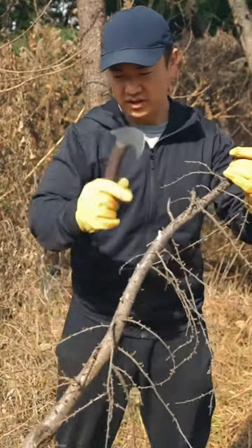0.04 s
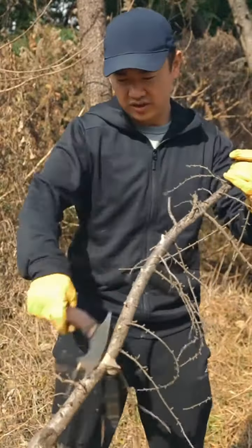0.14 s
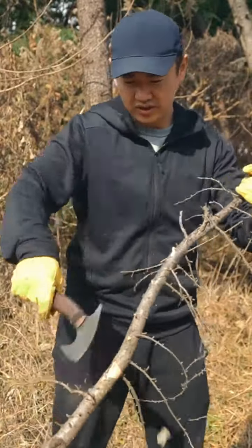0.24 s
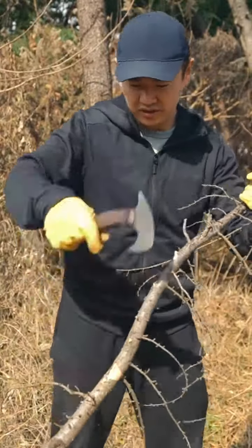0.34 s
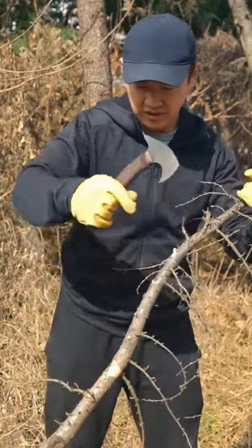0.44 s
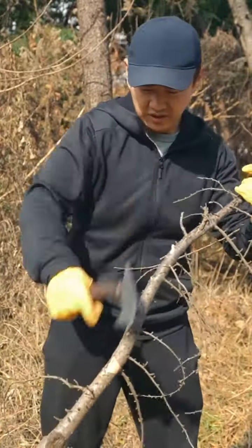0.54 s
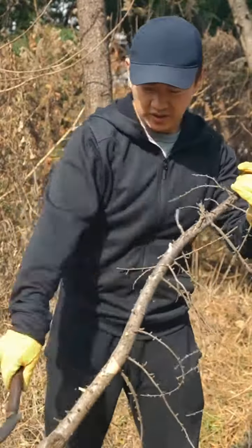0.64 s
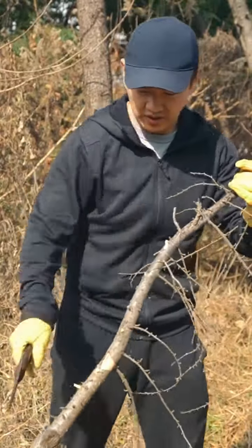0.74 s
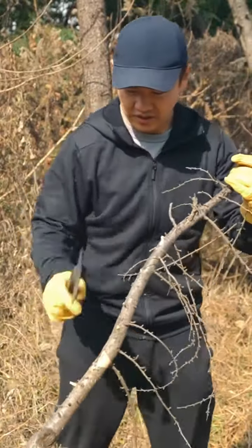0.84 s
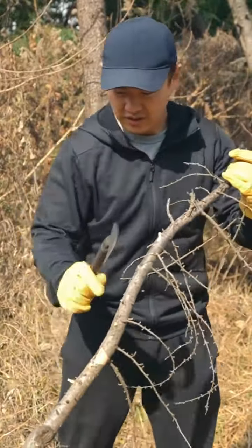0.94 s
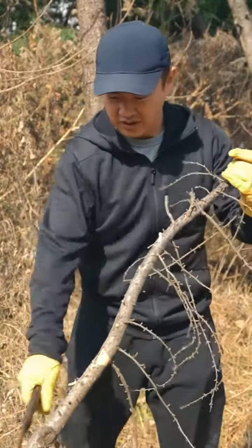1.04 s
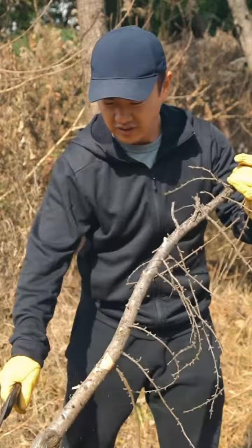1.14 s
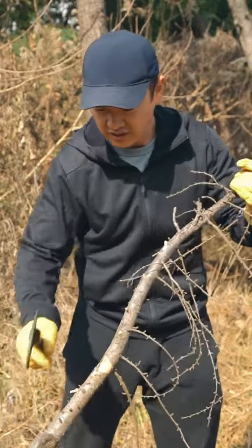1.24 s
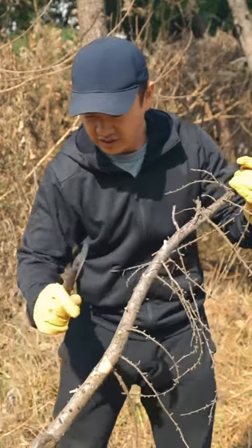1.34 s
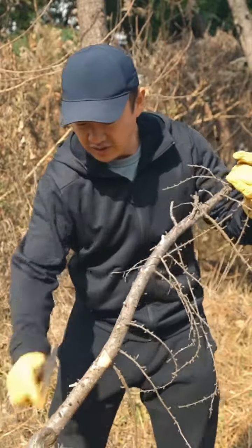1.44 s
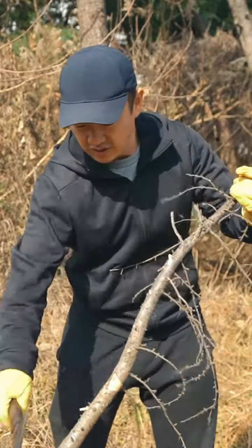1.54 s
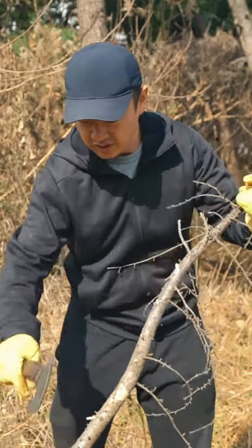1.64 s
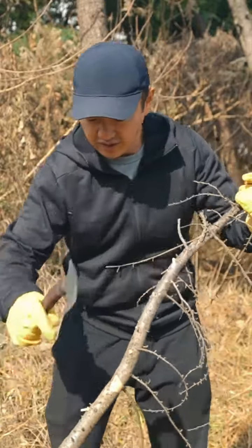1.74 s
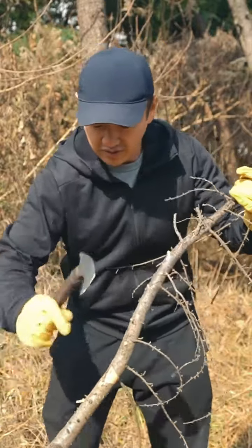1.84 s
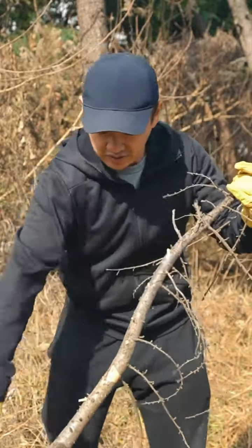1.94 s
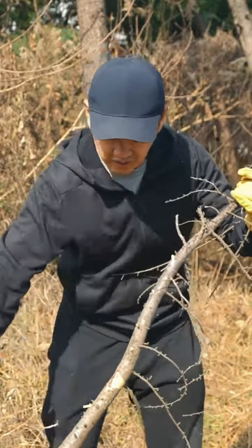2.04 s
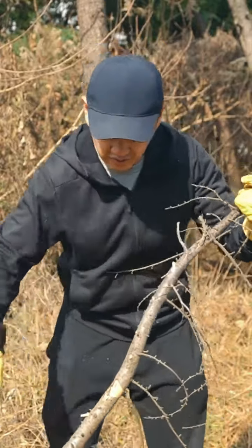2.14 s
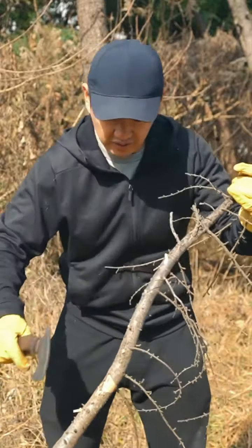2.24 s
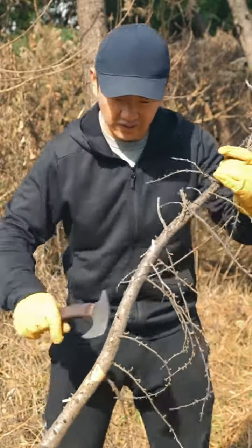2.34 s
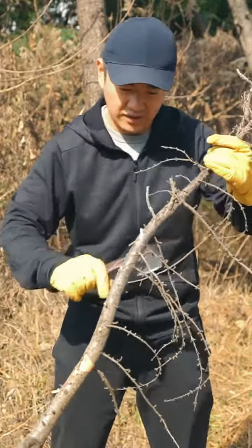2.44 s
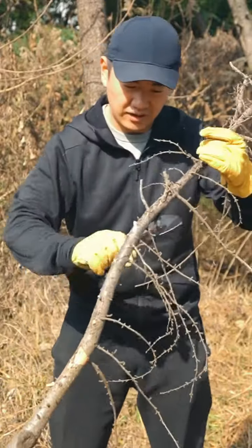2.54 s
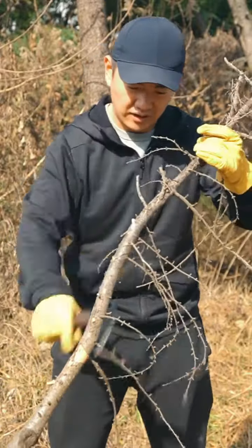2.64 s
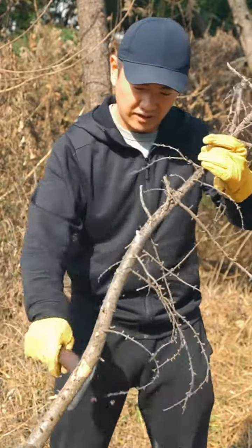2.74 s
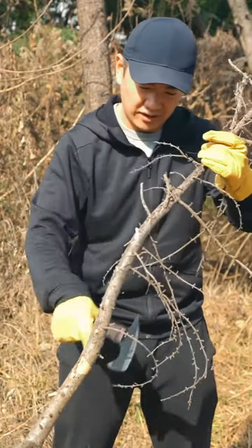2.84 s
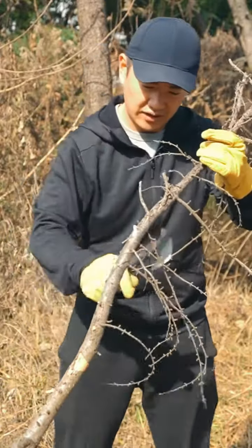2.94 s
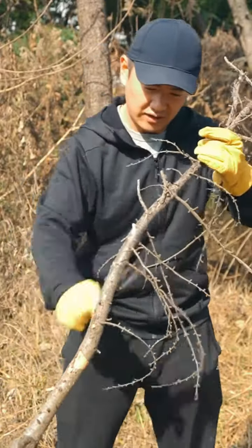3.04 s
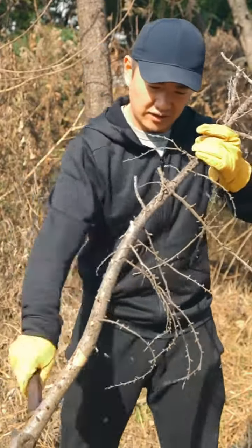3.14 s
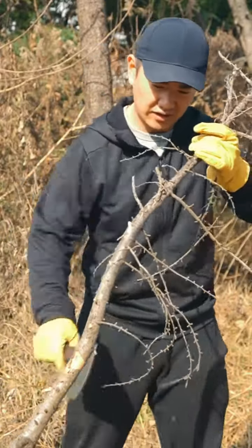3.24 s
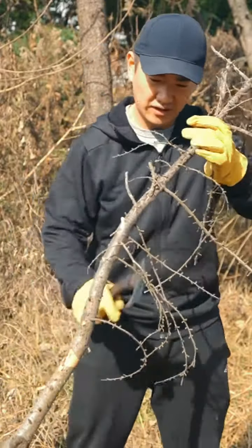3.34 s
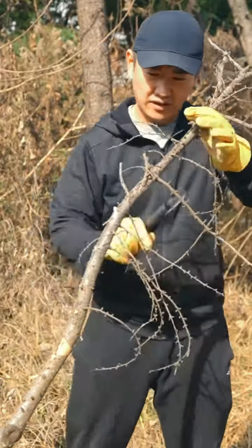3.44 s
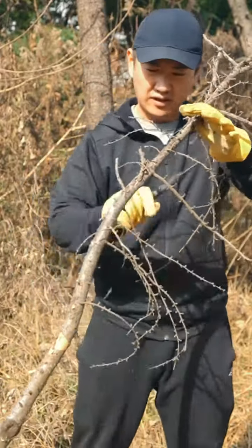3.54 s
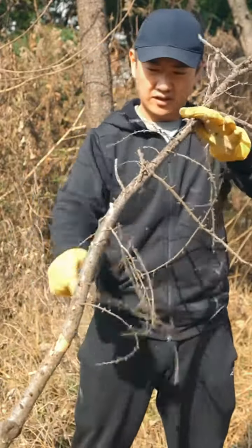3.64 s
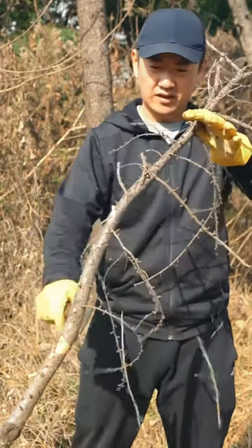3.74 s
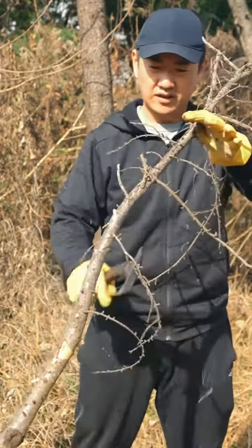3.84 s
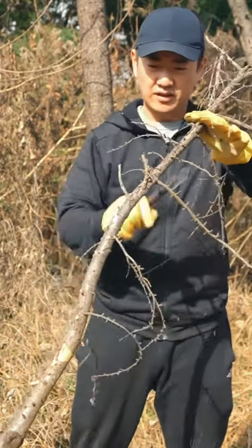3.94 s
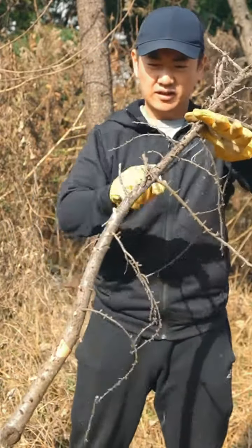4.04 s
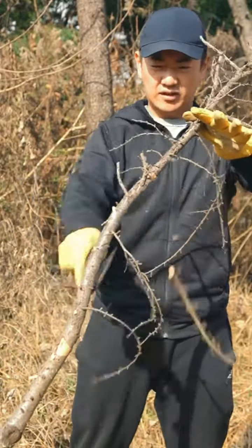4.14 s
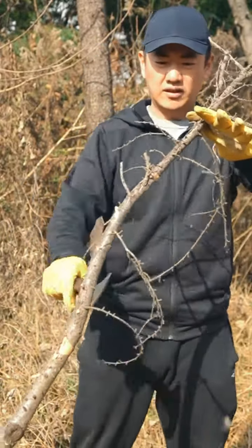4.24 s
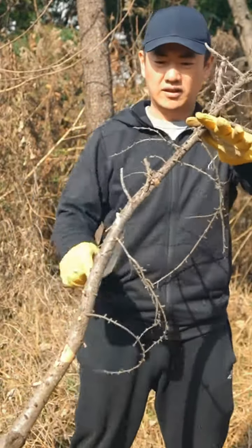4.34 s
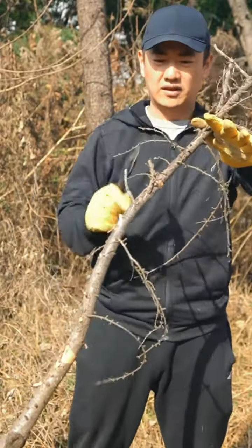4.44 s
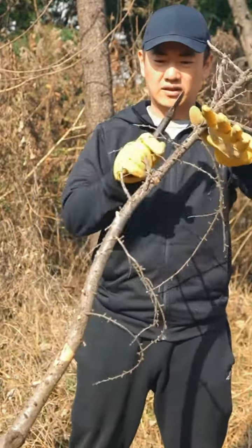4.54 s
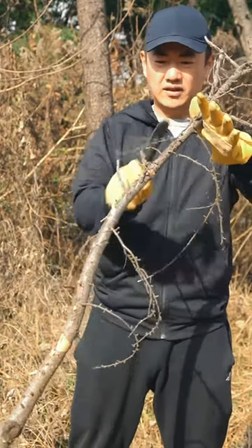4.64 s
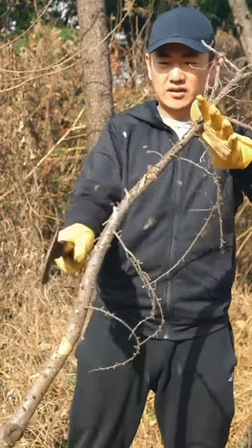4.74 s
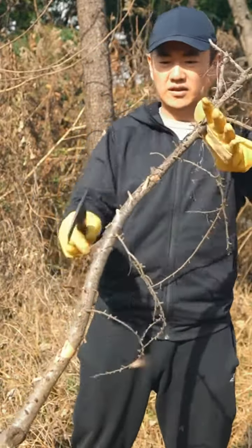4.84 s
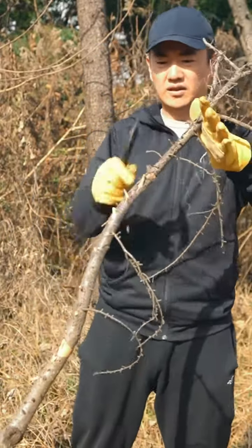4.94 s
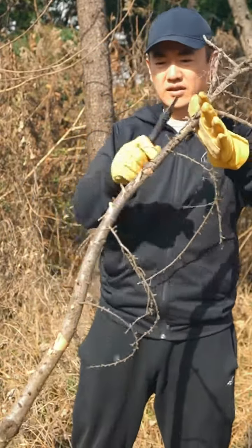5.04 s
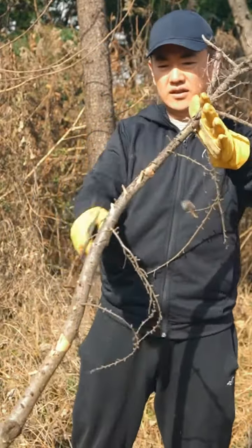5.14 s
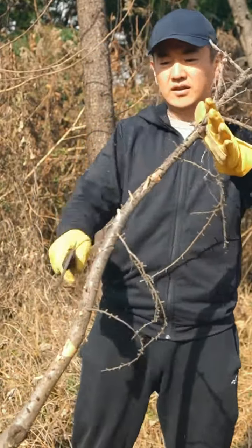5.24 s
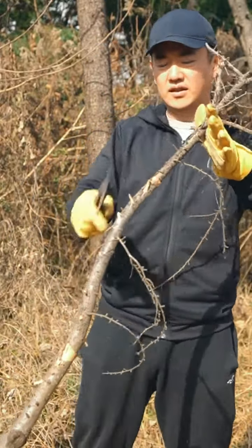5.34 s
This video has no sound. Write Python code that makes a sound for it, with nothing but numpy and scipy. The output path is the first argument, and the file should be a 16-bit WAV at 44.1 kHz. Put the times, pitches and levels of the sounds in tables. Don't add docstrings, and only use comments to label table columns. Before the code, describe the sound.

A hand axe chops dry twigs off a held branch outdoors, sharp woody cracks with twig ticks and rustle over a low distant drone.

```python
import sys
import numpy as np
from scipy import signal
from scipy.fft import rfft, irfft, next_fast_len
from scipy.io import wavfile
from scipy.ndimage import uniform_filter1d

SR = 44100
rng = np.random.default_rng(int(sys.argv[2]) if len(sys.argv) > 2 else 0)


def master_out(mix):
    frames = np.transpose(np.atleast_2d(mix))
    ceiling = np.clip(frames, -1, 1)
    pcm = np.round(ceiling * 32767).astype(np.int16)
    wavfile.write(sys.argv[1], SR, pcm)


def level_to_linear(level):
    exponent = np.asarray(level, float) / 20
    return 10 ** exponent


N = 238443
TIME = np.arange(N) / SR
LAG_S = .0009
BRANCH_T60_S = .017


def unit(x):
    return x / np.sqrt(np.mean(x ** 2))


def peak(x, db):
    return x * level_to_linear(db) / np.max(np.abs(x))


def add(out, s, x):
    i = max(int(s * SR), 0)
    out[i:i + len(x)] += x[:N - i]


def band(x, lo_hz, hi_hz, order=2):
    sos = signal.butter(order, [lo_hz, min(hi_hz, .47 * SR)], "band", fs=SR, output="sos")
    return signal.sosfilt(sos, x)


def ring(x, hz, t60):
    r = np.exp(-np.log(1000) / (t60 * SR))
    turn = 2 * np.pi * hz / SR
    return signal.lfilter([np.sin(turn)], [1, -2 * r * np.cos(turn), r * r], x)


def colour(x, points):
    size = next_fast_len(len(x))
    hz, db = np.transpose(points)
    bins_hz = np.arange(size // 2 + 1) * SR / size
    gain = level_to_linear(np.interp(np.log(bins_hz + 1), np.log(hz), db, right=-90))
    return unit(irfft(rfft(x, size) * gain, size)[:len(x)])


def walk(rate):
    k = int(SR / rate)
    steps = np.repeat(rng.standard_normal(N // k + 1), k)
    return unit(uniform_filter1d(uniform_filter1d(steps, k), k)[:N])


def swell(s, db, rise, fall, hold=0):
    early = (s - TIME) / max(rise, 1e-3)
    late = np.maximum(TIME - s - hold, 0) / max(fall, 1e-3)
    return level_to_linear(db - 20 * np.maximum(early, late))


def grit(size, share, spread_db):
    noise, pick, tall = rng.standard_normal(size), rng.random(size), rng.exponential(size=size)
    return unit(noise * np.where(pick < share, level_to_linear(5.5 + spread_db * tall), 1))


def crackle(size, rate, spread_db, seconds):
    pick, tall = rng.random(size), rng.exponential(size=size)
    starts = np.where(pick < rate / SR, level_to_linear(spread_db * np.minimum(tall, 2.5)), 0)
    return 1 + signal.lfilter([1], [1, -np.exp(-1 / (seconds * SR))], starts)


def slips(t, seconds, first=4.4):
    volley = grit(len(t), 0.081, 3.6) * np.exp(-t / seconds)
    volley[0] += first
    return volley


def crack(db, branch_hz, branch_db, splinter_hz, snap_db, splinter_octaves):
    t = TIME[:3000]
    push, odd = slips(t, 0.003, first=7.5), rng.random(3)
    soft_hz = min(9000 * 2 ** (snap_db / 10), .4 * SR)
    soft = signal.lfilter(*signal.butter(2, soft_hz, fs=SR), push)

    branch_ratios = (1, 0.554 + 0.254 * odd[0], 0.764 + 0.432 * odd[1])
    knock = sum(ring(soft, branch_hz * ratio, BRANCH_T60_S) for ratio in branch_ratios)
    knock += 0.43 * band(soft, 300, 1500, order=1)

    splinter_hz, splinter_t60_s = splinter_hz * 2 ** (splinter_octaves * odd[2]), .006
    splinter = ring(soft, splinter_hz, splinter_t60_s)
    splinter += 0.33 * ring(soft, splinter_hz * (1.29 + 0.31 * odd[1]), splinter_t60_s)
    splinter += 6.3 * band(soft, 1900, 4970)

    snap = band(push * np.exp(-t / 0.0017), 6640, 13800)
    sound = peak(band(knock, 330, 9000), db + branch_db)
    sound += peak(band(splinter, 1560, 6100, order=1), db + 0.5)
    return sound + peak(snap, db + snap_db)


# [t/s, splinter peak level/dB, branch f/Hz, splinter f/Hz, snap level over splinter/dB]
MAIN_BREAKS = [(0.0746, 6.5, 570, 3310, 4), (0.082, 1, 1210, 4660, -1), (0.0933, -6, 1450, 1970, -8),
               (0.1105, -5.5, 1370, 3000, -3), (0.1277, -11.5, 1810, 4480, -3),
               (0.5314, -0.5, 1295, 3600, 5), (0.971, 4, 1250, 3170, 1.5), (1.4228, 7, 1200, 2800, 4.5),
               (1.4765, 2, 1650, 2300, 7), (1.8745, -0.5, 1990, 2070, 12.5),
               (1.8929, -5.5, 1180, 2940, -22), (2.602, -0.5, 1380, 2330, -13),
               (2.6098, -1.5, 800, 3120, -1.5), (2.6141, -2, 1270, 2530, 3), (3.0325, -6, 1150, 3240, -5),
               (3.5829, 2.5, 1290, 1980, 3), (3.5936, -5, 856, 2390, -3), (3.6848, -9, 930, 3240, 5.5),
               (4.0544, -2.5, 1640, 3390, 13.5), (4.0981, -5, 730, 2520, -25), (4.6259, -3, 1500, 2920, -8),
               (4.6322, -8, 1256, 3360, 23), (5.066, 0.5, 700, 2490, 3)]
# [t/s, splinter peak level/dB, branch f/Hz, branch level over splinter/dB, snap level over splinter/dB]
LIGHT_KNOCKS = [(0.0973, -11.5, 900, -1, 15), (0.984, -7, 1050, -7, -14), (0.997, -20.5, 810, 11.5, -20),
                (1.4494, -9, 1250, 2, -33), (2.573, -22, 1500, 1.5, -3), (3.0111, -14, 760, -7, 3),
                (3.016, -24, 830, 8, -15), (3.0385, -16, 1200, 4, 0), (1.8748, -12, 700, 4, -20),
                (2.6025, -18, 560, 5, -20), (.9725, -19, 560, 5, -20), (3.0265, -10.5, 1080, 7.5, -9),
                (3.0528, -23, 830, 13, -12), (3.5582, -9.5, 905, 3.5, -4), (3.6065, -11, 613, 2.5, -9),
                (4.0536, -9.5, 820, 1.5, -26), (4.0664, -13, 910, -9, -10), (4.108, -12, 1480, 3.5, -21),
                (2.607, -7, 1450, -1, -13), (1.8842, -9, 900, -6, -7), (4.7391, -19, 2000, 4, 1),
                (4.716, -16, 2100, 1.5, -10)]
# [t/s, splinter peak level/dB, splinter f/Hz, snap level over splinter/dB]
THIN_SPLITS = [(0.5289, 0, 1700, -31), (1.4691, -7, 2050, -22), (1.4884, -5.5, 2940, 6),
               (1.505, -16, 4500, 9), (1.4935, -15, 2600, 0), (1.498, -15, 3300, 0), (1.511, -14, 2200, 0),
               (1.911, -10, 3600, -12), (1.915, -10, 3900, -4.5), (1.921, -20, 3000, 5.5),
               (2.6478, -10, 4350, 4), (5.065, -10, 3380, 7), (4.6023, -9, 4800, -11),
               (4.6116, -6.5, 2980, -2), (4.7104, -9.5, 2310, 3), (4.781, -24, 4440, 23),
               (4.797, -20, 4440, 11)]


def cracks():
    out, events = np.zeros(N), []
    for s, db, branch_hz, splinter_hz, snap_db in MAIN_BREAKS:
        branch_db = -4 + 7 * np.log2(branch_hz / 1200)
        events.append((s, db, branch_hz, branch_db, splinter_hz, snap_db, 0))
    for s, db, branch_hz, branch_db, snap_db in LIGHT_KNOCKS:
        events.append((s, db, branch_hz, branch_db, 2140, snap_db, 0.32))
    for s, db, splinter_hz, snap_db in THIN_SPLITS:
        events.append((s, db, 1160, -19, splinter_hz, snap_db, 0))
    for s, *settings in sorted(events):
        add(out, s + LAG_S, crack(*settings))
    return out


# [t/s, ring level/dB, lower-mode level/dB, time the edge chatters in the wood/s, upper-mode level/dB]
STEEL_BLOWS = [(0.0755, -16, 0, 0.018, -6), (0.0984, -21, 0, .008, -6), (.127, -28, 3, 0.004, 7),
               (0.531, -14, -8, 0.005, 1), (0.972, -31, -3, 0.003, 10), (.985, -23, 0, .012, -14),
               (1.424, -14, 0, 0.0028, -10), (1.4754, -28, 0, 0.0025, -4), (1.8745, -11, -10, 0.003, 1),
               (1.918, -25, -4, 0.0089, -6), (2.606, -21, 6, 0.006, -5), (3.034, -28, -3, 0.005, 7),
               (3.5575, -25, 0, 0.0031, 3), (3.594, -17, 0, 0.014, -9), (4.0536, -26, 0, 0.004, 0),
               (4.098, -23, 0, 0.0052, -14), (4.6124, -22, 4, 0.012, -2), (5.0664, -22, 0, 0.01, -8)]
# [f/Hz, level/dB]
HEAD_MODES = [(2859, -6), (3989, -8), (4640, -4), (7210, 0), (7919, -8), (8712, -14), (10890, -4),
              (13390, -13)]


def axe_head():
    out, t = np.zeros(N), TIME[:5000]
    t60_s, scatter_db = .021, 2
    for s, ring_db, lower_db, chatter_s, upper_db in STEEL_BLOWS:
        share = rng.standard_normal((len(HEAD_MODES), 3))
        edge = slips(t, chatter_s)
        edge /= np.sqrt(np.sum(edge ** 2))
        steel = np.zeros(len(t))
        for (hz, db), (level_odd, pitch_odd, decay_odd) in zip(HEAD_MODES, share):
            mode_db = db + scatter_db * level_odd
            if hz > 9500:
                mode_db += upper_db
            if hz < 6000:
                mode_db += lower_db
            mode = ring(edge, hz * (1 + 0.0046 * pitch_odd), t60_s * level_to_linear(scatter_db * decay_odd))
            steel += level_to_linear(mode_db) * mode
        add(out, s + LAG_S, level_to_linear(ring_db + 4.0) * steel)
    return out


# [t/s, thud level/dB]
BRANCH_THUDS = [
    (.0755, -29),
    (.127, -4),
    (1.424, -17),
    (1.8745, -3),
    (2.603, -31),
    (3.5575, -7),
    (3.594, -25),
    (4.0536, -8),
    (4.6124, -27),
    (5.0664, -15),
]


def thuds():
    out, t = np.zeros(N), TIME[:5000]
    tap = np.exp(-t / 0.000079) / 25
    for s, thud_db in BRANCH_THUDS:
        odd = rng.standard_normal(2)
        thud = ring(tap, 200 * (1 + 0.041 * odd[0]), 0.011)
        thud += 0.54 * ring(tap, 330 * (1 + 0.12 * odd[1]), 0.07)
        add(out, s + LAG_S, level_to_linear(thud_db) * band(thud, 175, 3000))
    return out


# [t/s, length/s, level/dB, centre f/Hz, hiss level over body/dB]
FIBRE_TEARS = [(.085, 0.056, -21, 1820, -1.5), (0.531, 0.018, -14.5, 1250, -4),
               (0.973, 0.022, -11.5, 1160, -11), (1.432, 0.094, -22.5, 1680, -3.5),
               (1.474, 0.013, -16, 1800, 4), (1.486, 0.05, -23, 2200, 5), (1.874, 0.012, -18.5, 1010, -3),
               (1.889, .045, -21, 2400, -9), (2.6002, 0.031, -11.5, 1475, -21),
               (2.63, 0.038, -24, 2010, -1), (2.65, 0.026, -25, 3000, 4), (3.012, 0.028, -21.5, 1010, -7),
               (3.024, 0.033, -18, 1170, -12), (3.554, 0.038, -18, 1280, -14),
               (3.585, 0.062, -12.5, 1080, -13), (4.058, 0.029, -20, 900, -2),
               (4.096, 0.022, -14, 1813, -16), (4.338, 0.025, -35, 2790, -6),
               (4.612, 0.036, -15, 1580, -2.5), (4.704, 0.021, -21.5, 2020, 3),
               (4.736, 0.022, -28.5, 1800, -10), (4.789, 0.042, -30.5, 4300, 4.5),
               (5.062, 0.028, -18.5, 1200, -4)]
# [f/Hz, level/dB]
LEAF_SPECTRUM = [(710, -30), (1200, 0), (2740, -5), (2980, -3), (4070, -4), (6370, -5.5), (7730, -3),
                 (10800, -8), (12600, -4), (15500, -9)]


def tears():
    out, t = np.zeros(N), TIME[:7000]
    for s, length, db, hz, hiss_db in FIBRE_TEARS:
        stream = grit(len(t), .01, 2.0) * crackle(len(t), 400, .8, .001)
        wood = sum(unit(ring(stream, hz * ratio, BRANCH_T60_S)) for ratio in (.5, .85, 1.3))
        body = unit(unit(band(stream, hz / 2.96, hz * 1.88)) + .5 * wood)
        body *= np.exp(-(t / length) ** 2 * 1.56)
        hiss = unit(band(colour(stream, LEAF_SPECTRUM), 2000, 12000))
        hiss *= np.exp(-(t / length) ** 0.94 * 1.77)
        onset = np.minimum(t / .004, 1)
        add(out, s + 2 * LAG_S, level_to_linear(db + 1.0) * (body + level_to_linear(hiss_db) * hiss) * onset)
    return out


# [t/s, peak level/dB, centre f/Hz, snap level over tick/dB]
TWIG_TICKS = [(.2476, -22, 5000, -12), (0.3803, -24, 4440, 1), (0.4756, -7, 3940, -20),
              (.506, -25, 4100, 3), (.6866, -29, 4000, 13), (0.7767, -20.5, 2400, 8),
              (0.8753, -12, 3970, -10), (1.055, -24, 2840, 7), (1.188, -17, 6200, -15),
              (1.255, -15.5, 5100, -3), (1.666, -23, 5000, -33), (1.715, -21.5, 3770, -16),
              (1.8128, -11, 4300, 1), (1.989, -20, 6000, 6), (2.024, -17, 3500, 4), (2.149, -9, 3930, 11),
              (2.288, -12.5, 4970, 2), (2.642, -22, 4500, 8), (2.66, -20, 4500, 8),
              (2.7155, -17.5, 5200, -2), (2.733, -23, 3000, 9), (2.81, -19, 4430, -15),
              (2.837, -35, 4000, 5), (2.9104, -22, 5000, 18), (2.926, -16, 4500, 2),
              (2.9927, -18, 3600, -7), (2.994, -19, 3370, 10), (3.003, -30, 4000, 10),
              (3.025, -22, 5000, 17), (3.102, -27, 3800, 12.5), (3.247, -16, 5250, 4),
              (3.6626, -17, 4680, -9), (3.667, -16.5, 4500, -6), (3.8207, -17, 5150, 0),
              (3.8346, -16, 4950, 2), (3.964, -26, 4160, 14), (4.268, -24, 5210, -12),
              (4.3455, -13, 7500, 0), (4.567, -20, 5360, -17), (4.393, -21, 5000, -2),
              (4.5847, -22, 5000, -2), (4.9286, -14, 4600, -16), (5.0242, -25, 5000, 13),
              (5.0412, -24, 5000, 6), (5.059, -18, 4500, 13), (5.084, -13, 4800, 11),
              (5.089, -12.5, 3700, 2), (5.115, -18, 3940, 9), (5.2368, -18, 5550, -16.5),
              (.2151, -26, 5000, 12), (.5908, -24, 2600, 8), (.6606, -27, 4000, 10),
                 (.7439, -28, 3500, 0), (.8981, -21, 3000, 0), (.904, -22, 4000, 0), (.911, -23, 4000, 0),
                 (1.965, -22, 7500, -2), (2.069, -21, 3200, -12), (3.088, -23, 4700, -8),
                 (4.3398, -17, 7000, 3), (4.5394, -26, 4360, -5), (4.9639, -23, 3280, 0)]


def ticks():
    out, t = np.zeros(N), TIME[:1500]
    for s, db, hz, snap_db in TWIG_TICKS:
        push = slips(t, 0.0015)
        tick = peak(band(push, hz / 1.1, hz * 1.1, order=1), db - 5.5)
        tick += peak(band(push, hz / 1.6, hz * 1.76), db - 15)
        tick += peak(band(push, 7500, 12200), db + snap_db - 11.5)
        add(out, s + LAG_S, tick)
    return out


# [t/s, body level/dB, time to fall 20 dB/s, hiss level over body/dB]
SETTLING_LEAVES = [(.15, -27, 0.02, -14), (.56, -35, 0.16, -8), (1.029, -33.5, 0.03, -14),
                   (1.55, -35.5, 0.25, -9.5), (1.94, -34.5, 0.44, -6), (2.68, -34.5, 0.42, -11.5),
                   (3.07, -46, 0.4, -13), (3.65, -33, 0.4, -8), (4.14, -37.5, 0.3, -8),
                   (4.66, -33, 0.11, -9), (4.82, -33, 0.2, -1), (5.11, -39, 0.45, -7.5)]
# [start t/s, hold/s, body level/dB, time to fall 20 dB/s, hiss level over body/dB]
TWIG_BRUSHES = [(0.035, 0.0035, -47, 0, 8), (0.184, 0.15, -43, 0.46, -4.5), (0.653, 0.043, -51, -0.4, -2),
                (0.776, 0.0066, -42, -0.3, -6), (.874, 0.0077, -43, 0.3, -7), (1.183, 0.01, -40, 0.03, -7),
                (1.255, 0.0065, -38, -0.2, -4.5), (2.064, 0.03, -43, 0.4, -14), (1.69, .025, -49, .06, 2),
                (.897, .016, -46, .05, -6), (.59, .01, -43, .06, -2), (1.673, 0.098, -48, 0.14, -2),
                (2.151, 0.014, -49, -0.22, 4), (2.292, 0.014, -42, 0, -4.5), (2.352, .1, -45, -0.14, -6.5),
                (2.576, .012, -38, 0.08, -9), (2.87, 0.053, -39.5, 0.08, 1.5),
                (2.993, 0.017, -33, -0.03, -4.5), (3.21, 0.026, -34.5, 0.15, -5),
                (3.35, .01, -48, 0.5, -5.5), (3.78, 0.022, -40.5, 0.15, -7),
                (3.914, 0.06, -44.5, 0.1, -1.3), (4.26, 0.0089, -44, 0.4, -10.5),
                (4.334, 0.006, -44, 0.2, 2), (4.343, .008, -40, .2, -1), (4.53, 0.11, -49, 0.1, -4),
                (4.944, .05, -39.5, .5, -9), (5.25, 0.018, -40.5, 0, -2)]


def rustle():
    body_gain, hiss_gain = np.zeros(N), np.zeros(N)
    for s, db, fall, hiss_db in SETTLING_LEAVES:
        gain = swell(s, db, 0.065, fall)
        body_gain += gain
        hiss_gain += gain * level_to_linear(hiss_db)
    for s, hold, db, fall, hiss_db in TWIG_BRUSHES:
        gain = swell(s, db, 0.006, fall, hold)
        body_gain += gain
        hiss_gain += gain * level_to_linear(hiss_db)
    contacts = grit(N, 0.0075, 2.73) * crackle(N, 260, 2.2, 0.0012)
    contacts *= level_to_linear(2.0 * walk(55) + .8 * walk(20))
    leaves = colour(contacts, LEAF_SPECTRUM)
    body, hiss = unit(band(leaves, 1500, 6600)), unit(band(leaves, 5800, 14000))
    return level_to_linear(-2.0) * body_gain * body + level_to_linear(3.5) * hiss_gain * hiss


# [f/Hz, level/dB]
GRASS_SPECTRUM = [(1470, -31), (2500, -7.5), (5120, 3.5), (6200, -2), (7980, 3), (10300, -8), (13300, -3),
                  (14800, -2), (15500, -10)]


def undergrowth():
    stir = rng.standard_normal(N) * crackle(N, 70, 5.5, 0.0014)
    stir *= level_to_linear(.6 * walk(7.4) + 1.9 * walk(35))
    return level_to_linear(-46.5) * colour(stir, GRASS_SPECTRUM)


# [t/s, level/dB, time to rise and to fall 20 dB/s]
WIND_GUSTS = [
    (.13, -23, 0.13),
    (.4, -24.5, 0.53),
    (1.0, -26, .5),
    (1.42, -34, 0.3),
    (2.26, -35.5, 0.25),
    (3.45, -29, 0.3),
    (3.75, -36, 0.06),
    (4.55, -28, .5),
    (5.04, -31, 0),
    (5.32, -17, 0.04),
]


def wind():
    gain = level_to_linear(-36) + sum(swell(s, db, length, length) for s, db, length in WIND_GUSTS)
    return gain * unit(band(rng.standard_normal(N), 8.1, 22.4))


# [t/s, f/Hz]
ENGINE_FIRING = [
    (0, 80),
    (.95, 83),
    (1.3, 72),
    (1.6, 72),
    (2.1, 64),
    (2.6, 66.5),
    (4.3, 68),
    (5.41, 74),
]
# [t/s, level/dB]
ENGINE_LOAD = [(0, -48.5), (.33, -32), (1.05, -33.5), (1.3, -44), (1.6, -41), (1.95, -38), (2.15, -27),
               (2.5, -25.5), (2.9, -29), (3.35, -26.5), (3.55, -32), (3.8, -30), (4.1, -31), (4.6, -31.5),
               (4.95, -37), (5.15, -38.5), (5.32, -34), (5.41, -40)]
# [t/s, depth/dB, time for the depth to grow and to shrink tenfold/s]
ENGINE_DIPS = [(.2, 6, .2), (.48, 14, .25), (.71, 7, .1), (.95, 8, .1), (1.11, 8, .08), (2.24, 20, .11),
               (2.41, 12, .1), (2.68, 16, .25), (3.01, 10, .2), (3.44, 20, .12), (3.88, 17, .14),
               (4.32, 17, .14), (4.44, 6, .1), (5.1, 14, .14)]


def engine():
    hz = np.interp(TIME, *np.transpose(ENGINE_FIRING))
    db = np.interp(TIME, *np.transpose(ENGINE_LOAD))
    db = db + .7 * np.cos(2 * np.pi * 2.386 * (TIME - 3.6))
    db = db - sum(depth * swell(s, 0, back, back) for s, depth, back in ENGINE_DIPS)
    phase = 2 * np.pi * np.cumsum(hz * (1 + 0.03 * walk(14))) / SR
    first = level_to_linear(db + 1.2 * walk(11)) * np.sin(phase)
    second = swell(4.1, -44, 3.5, 2.3) * level_to_linear(3.4 * walk(8.8)) * np.sin(2 * phase)
    return np.sqrt(2) * (first + second)


# [f/Hz, level/dB]
ROAD_SPECTRUM = [(24, -45), (40, -3), (81, -5), (123, -12), (189, -16), (407, -17), (626, -13.5),
                 (999, -14.5), (1960, -28), (3500, -38.5), (4550, -43.5), (7700, -120)]


def road():
    sway_db = .5 * (walk(1.1) + walk(7.02))
    return level_to_linear(-33 + sway_db) * colour(rng.standard_normal(N), ROAD_SPECTRUM)


def scene():
    near = cracks() + ticks() + axe_head() + thuds() + tears()
    ground = band(np.roll(near, int(0.0041 * SR)), 200, 3400, order=1)
    near = near + level_to_linear(-24) * ground + rustle()
    return (near + undergrowth() + road() + engine() + wind())[None]


def top_cut(x):
    return signal.sosfilt(signal.butter(12, 16470, fs=SR, output="sos"), x)


def record(dry):
    held = dry / (1 + np.abs(dry / .8) ** 4) ** (1 / 4)
    shelf = signal.sosfilt(signal.ellip(6, .2, 20, 15600, fs=SR, output="sos"), held)
    cut = signal.sosfilt(signal.ellip(10, .2, 60, 16450, fs=SR, output="sos"), shelf)
    return top_cut(cut)


dry = scene()
out = record(dry)
master_out(out)
```